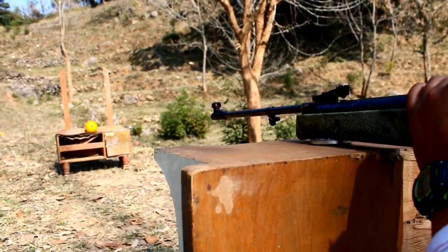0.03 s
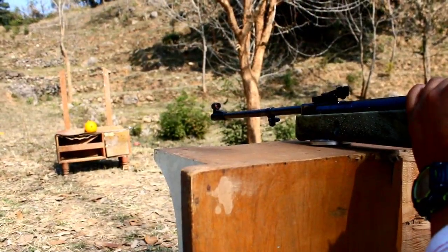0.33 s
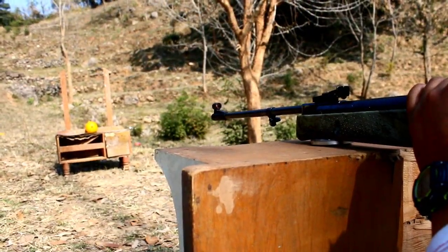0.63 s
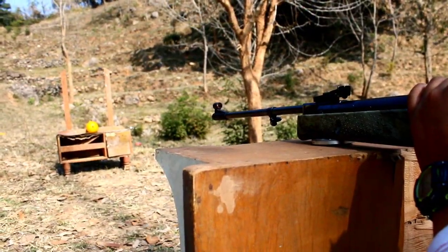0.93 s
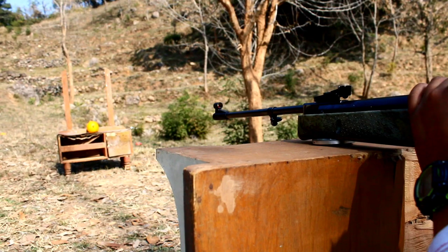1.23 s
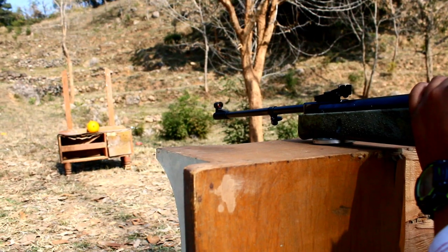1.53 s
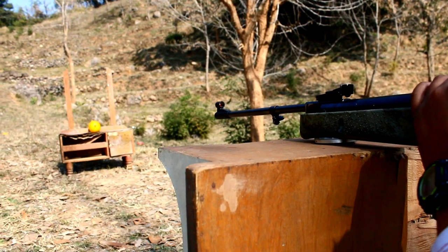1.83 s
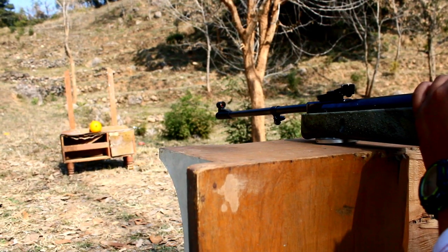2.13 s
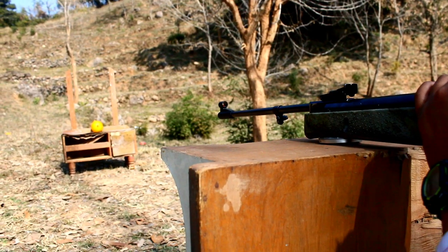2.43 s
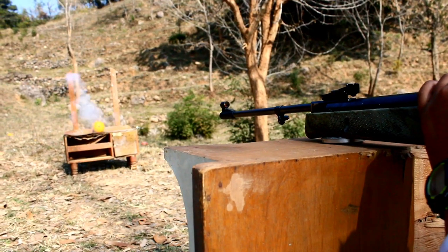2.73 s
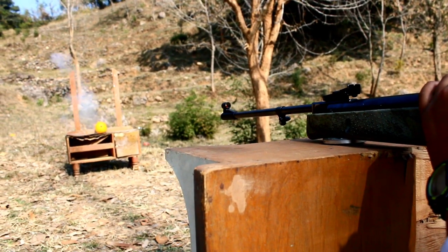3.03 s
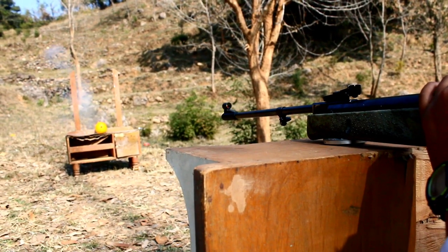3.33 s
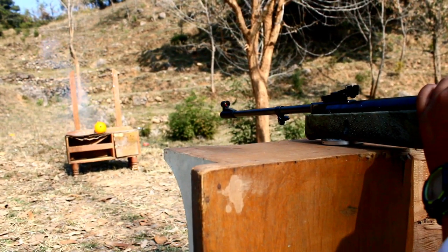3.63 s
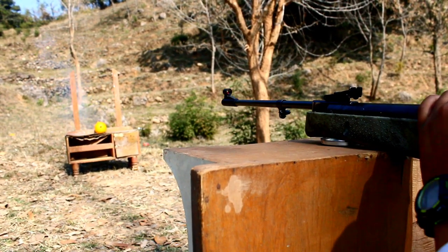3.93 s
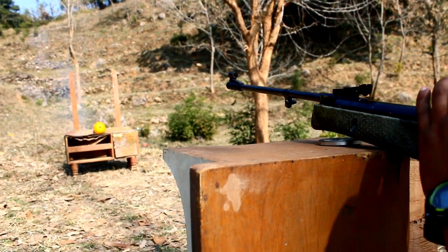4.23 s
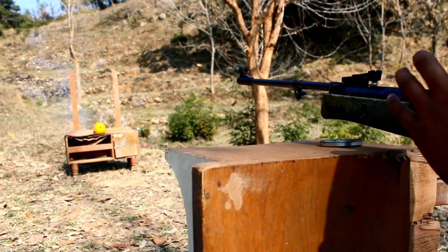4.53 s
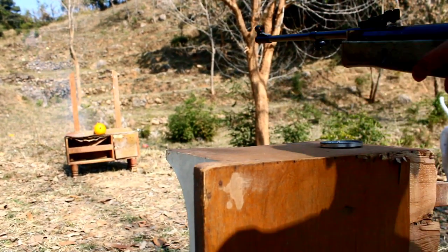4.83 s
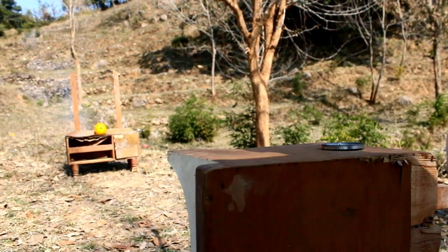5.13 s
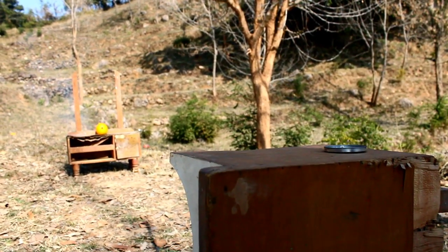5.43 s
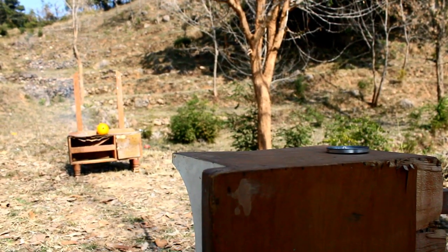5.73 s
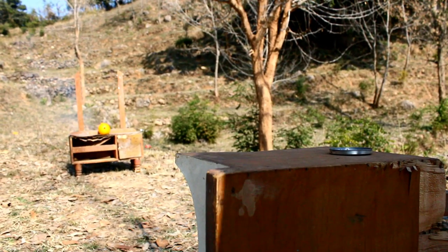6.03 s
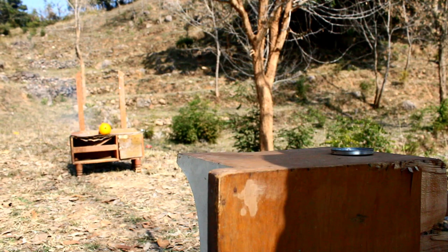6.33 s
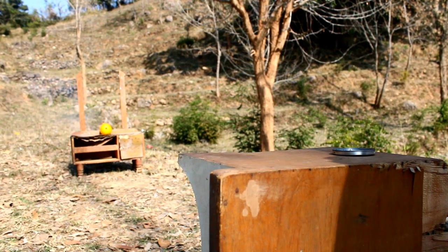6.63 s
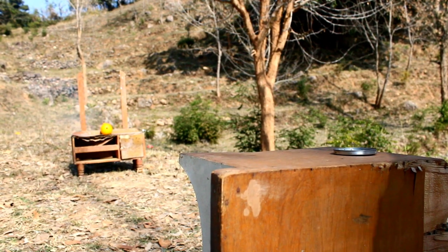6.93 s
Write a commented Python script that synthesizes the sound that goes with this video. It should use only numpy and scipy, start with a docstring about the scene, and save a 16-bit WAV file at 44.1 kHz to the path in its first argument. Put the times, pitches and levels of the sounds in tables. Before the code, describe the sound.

One sharp, loud bang from an air rifle and exploding target rolls away outdoors, followed by faint ticks, wooden knocks and crunching leaves.

```python
"""In still air below a wooded hillside, an air rifle clicks as it is handled and knocks on a wooden box.
The spring lets go, the piston slams, the shot cracks and the pellet sets off a small explosive charge,
overloading the microphone. Trees and slope roll the bang back while bits of debris tick down.
The stock is dragged off the drumming box, the rifle is lifted, and feet shift on dry leaves."""
import sys
import numpy as np
from scipy import signal
from scipy.fft import rfft, irfft, next_fast_len
from scipy.io import wavfile
from scipy.ndimage import uniform_filter1d

SR = 44100
rng = np.random.default_rng(int(sys.argv[2]) if len(sys.argv) > 2 else 0)


def wrap_up_sound(samples):
    """Save the sound to the file named by the first command line argument, as 16-bit audio."""
    columns = np.atleast_2d(samples).T
    # keep every value between -1 and 1, then stretch to whole-number steps
    tamed = np.clip(columns, -1, 1)
    steps = np.round(tamed * 32767).astype(np.int16)
    wavfile.write(sys.argv[1], SR, steps)


N = 308435
TIME_S = np.arange(N) / SR


def from_db(db):
    """Decibels to gain."""
    return 10 ** (np.asarray(db) / 20)


def unit_rms(x):
    """Scale to rms 1."""
    return x / np.sqrt(np.mean(np.abs(x) ** 2) + 1e-20)


def butter(x, hz, kind, order=2):
    """Causal Butterworth filter."""
    sos = signal.butter(order, np.clip(hz, 10, .45 * SR), kind, fs=SR, output="sos")
    return signal.sosfilt(sos, x + 1e-18)


def coloured(x, spectrum):
    """Shape x by (Hz, dB) points on a log-frequency axis; rms 1."""
    size = next_fast_len(len(x))
    hz, db = np.transpose(spectrum)
    bin_hz = np.maximum(np.fft.rfftfreq(size, 1 / SR), 1)
    gain = from_db(np.interp(np.log(bin_hz), np.log(hz), db))
    return unit_rms(irfft(rfft(x, size) * gain, size)[:len(x)])


def resonance(x, hz, width_hz):
    """Two-pole resonance, peak gain 1."""
    r = np.exp(-np.pi * width_hz / SR)
    feedback = [1, -2 * r * np.cos(2 * np.pi * hz / SR), r * r]
    return signal.lfilter(np.array([1, 0, -1]) * (1 - r * r) / 2, feedback, x)


def decay(t, t60_s):
    """Exponential fall, 60 dB in t60_s."""
    return np.exp(-np.log(1000) * t / t60_s)


def swell(peak_s, db, rise_s, fall_s):
    """Power envelope: up 20 dB per rise_s until peak_s, then down 20 dB per fall_s."""
    drop_db = 20 * np.maximum((peak_s - TIME_S) / rise_s, (TIME_S - peak_s) / fall_s)
    return from_db(db - drop_db.clip(max=200)) ** 2


def patches(shape, size):
    """Smooth random field over frequency and time; rms 1."""
    field = rng.standard_normal(shape)
    for axis in (0, 1, 0, 1):
        field = uniform_filter1d(field, size, axis=axis)
    return unit_rms(field)


def grains(per_s, spread_db):
    """Random clicks of uneven size."""
    sizes = from_db(spread_db * np.minimum(rng.exponential(1, N), 4)) * rng.choice([-1, 1], N)
    return sizes * (rng.random(N) < per_s / SR)


def add(out, start_s, sound):
    """Mix a sound in at start_s."""
    at = round(start_s * SR)
    out[at:at + len(sound)] += sound[:N - at]


# outdoor air: (frequency [Hz], density [dB])
AIR_SPECTRUM = [(15, -41), (25, -10.5), (59, -13.5), (154, -2), (318, -3.5), (415, -5.5), (450, -3.5),
                (749, -6), (833, -7), (978, -6.5), (2560, -11), (5570, -20.5), (7890, -35), (15000, -41)]


def still_air(level_db=-69):
    """Faint, steady outdoor noise."""
    return from_db(level_db) * coloured(rng.standard_normal(N), AIR_SPECTRUM)


# rifle modes: (frequency [Hz], level [dB], t60 [s])
RIFLE_MODES = [(417, -6.5, 0.015), (752, -4.5, 0.03), (970, 2, 0.01678), (1350, -6, 0.02763),
               (1778.8, -2, 0.017), (2030, -3.5, 0.017), (2510, -0.5, 0.023), (2720, -10, 0.039),
               (3480, -6, 0.01122), (4187.2, -3.5, 0.01718), (5105, -10, 0.0155)]
# handling contacts: (time [s], level [dB], low-pass cutoff [Hz])
RIFLE_CLICKS = [(0.093, -51, 2200), (0.116, -47, 4500), (1.089, -49.5, 2400), (1.152, -52, 4200),
                (4.4402, -39, 5400), (4.467, -53, 3497), (4.501, -45.5, 2600), (4.527, -46, 2893),
                (4.537, -52, 2200), (4.549, -53, 4500), (5.192, -51, 3480)]


def handling(crack_db=-6, crack_t60_s=0.032, spread_db=1.1):
    """Each click rings the rifle's modes with strengths of its own; a soft contact dulls it."""
    out, t = np.zeros(N), TIME_S[:SR // 8]
    for start_s, db, cutoff_hz in RIFLE_CLICKS:
        ring = 0
        for hz, mode_db, t60_s in RIFLE_MODES:
            gain = from_db(mode_db + rng.normal(0, spread_db)) * rng.choice([-1, 1])
            ring += gain * np.sin(2 * np.pi * hz * t) * decay(t, t60_s)
        crack = from_db(crack_db) * rng.standard_normal(len(t)) * decay(t, crack_t60_s)
        click = butter(ring + crack, cutoff_hz, "low", order=3)
        add(out, start_s, from_db(db) * click / np.abs(click).max())
    return out


# stock on the box, heels and twigs: (time [s], level [dB], pitch [Hz])
KNOCK_CONTACTS = [(1.924, -60, 200), (3.536, -45, 258), (3.655, -51, 240.3), (4.124, -44.5, 699.5),
                  (4.126, -42.5, 302), (4.14, -43, 85), (4.147, -47.5, 1400), (4.17, -57, 2806),
                  (4.9, -61, 240), (5.697, -61, 200), (5.748, -54, 190), (5.767, -46.5, 144.7),
                  (5.8743, -45.5, 259.6), (5.877, -39, 1060), (5.924, -55.5, 1396), (6.052, -52, 3795),
                  (6.097, -43, 2310), (6.099, -45.5, 605), (6.221, -54, 2303), (6.235, -51, 900),
                  (6.263, -54.5, 1900), (6.343, -57, 1400)]


def knocks(width_ratio=0.35, top_ratio=3.4, t60_1khz_s=0.029, t60_power=0.37):
    """Short rough contacts, each through one broad, damped resonance; lower ones last longer."""
    out, t = np.zeros(N), TIME_S[:SR // 6]
    for start_s, db, hz in KNOCK_CONTACTS:
        t60_s = t60_1khz_s * (1000 / hz) ** t60_power
        burst = rng.standard_normal(len(t)) * decay(t, t60_s)
        knock = butter(resonance(burst, hz, width_ratio * hz), top_ratio * hz, "low")
        add(out, start_s, from_db(db) * np.std(burst) * unit_rms(knock))
    return out


# steel spring modes: (frequency [Hz], level [dB], t60 [s])
SPRING_MODES = [(1470, -27, .09), (1840.5, -24.5, .09), (2573, -22.5, .04), (3137, -26.5, .045),
                (5044, -21, 0.024)]


def spring(start_s=2.5878):
    """The spring and its tube ring briefly when the sear lets go."""
    out, t = np.zeros(N), TIME_S[:SR // 6]
    for hz, db, t60_s in SPRING_MODES:
        add(out, start_s, from_db(db) * np.sin(2 * np.pi * hz * t) * decay(t, t60_s))
    return out


# spring, piston, muzzle crack and ground bounce, pellet strike and bounce, charge, near echoes:
# (time [s], spray level [dB], t60 [s], ring pitch [Hz], ring re spray [dB], pulse level [dB])
SHOT_BLOWS = [(2.5878, -16, 0.11, 1676, -6, -32.5), (2.6054, -19, 0.058, 313.5, 11.5, -7),
              (2.608, 4, 0.01, 3280, -3.5, -4), (2.6122, -4.5, 0.054, 2430, -5.5, -17.5),
              (2.6246, 1, 0.062, 2380, 1.5, -11), (2.638, -7.5, 0.015, 1994, -4.5, -15),
              (2.6602, 10, 0.054, 1103, 3.5, 4), (2.6668, -0.5, 0.052, 526, 8, -3),
              (2.677, -10.5, 0.089, 1380, 3.5, 2), (2.6845, -12.5, 0.035, 400.6, 5, -7),
              (2.6946, -3, 0.046, 1268, 2.5, -20)]
# spray of reflections: (frequency [Hz], density [dB])
SPRAY_SPECTRUM = [(30, -12.5), (70, -12), (150, -1), (280, 1.5), (600, -1), (1200, -1), (1700, -2),
                  (2700, 0.5), (3800, -9.5), (5200, -6.5), (6500, -14), (9000, -19), (15000, -30)]


def shot(pulse_s=.003, rise_s=0.00014, waver_ratio=0.23, waver_hz=700, sink_power=2.2):
    """Each blow: an N-shaped pressure pulse, a spray of near reflections, a ragged ring that sinks."""
    out, t = np.zeros(N), TIME_S[:SR // 4]
    pulse = (1 - 2 * t / pulse_s) * (t < pulse_s)
    for start_s, db, t60_s, hz, ring_db, pulse_db in SHOT_BLOWS:
        spray = coloured(rng.standard_normal(len(t)), SPRAY_SPECTRUM)
        waver = unit_rms(butter(rng.standard_normal(len(t)), waver_hz, "low"))
        sink_octaves_per_s = 9.8 * (hz / 1000) ** sink_power
        pitch_hz = hz * (2 ** (-sink_octaves_per_s * t) + waver_ratio * waver)
        ring = np.sqrt(2) * np.cos(2 * np.pi * np.cumsum(pitch_hz) / SR)
        envelope = from_db(db) * (1 - np.exp(-t / rise_s)) * decay(t, t60_s)
        add(out, start_s, from_db(pulse_db) * pulse + envelope * (spray + from_db(ring_db) * ring))
    return out


# scatter from ground and hillside: (frequency [Hz], density [dB])
ECHO_SPECTRUM = [(18, -64), (30, -34), (113, -11), (187, -16), (217, -11), (407, -7.5), (623, 0.5),
                 (821, -2.5), (1030, 0), (1420, -8.5), (2410, -6.5), (3430, -18), (5520, -26), (7270, -42),
                 (12000, -100), (15600, -130), (22000, -120)]


def near_ground(start_s=2.607, level_db=-21, t60_s=0.15):
    """The rifle's own report scatters off the ground and the nearest trees."""
    out, t = np.zeros(N), TIME_S[:SR // 2]
    scatter = coloured(rng.standard_normal(len(t)), ECHO_SPECTRUM)
    add(out, start_s, from_db(level_db) * decay(t, t60_s) * scatter)
    return out


# near trees, slope, upper bank, far hills: (peak time [s], level [dB], rise [s], fall [s])
HILL_RETURNS = [(2.68, -8.5, .03, 0.069), (2.73, -16, 0.12, 0.34), (2.865, -20, .1, 0.4),
                (3.3, -38, 0.52, 0.82)]


def hillside(start_s=2.672, onset_s=0.025, neutral_s=2.82, echoes_per_s=1500, patchy_db=1.4):
    """Countless echoes off trunks and banks; on the way, air takes the treble and ground the bass."""
    distinct = unit_rms(rng.standard_normal(N) * (rng.random(N) < echoes_per_s / SR))
    echoes = coloured(rng.standard_normal(N) + 0.62 * distinct, ECHO_SPECTRUM)
    echoes /= np.std(butter(echoes, [400, 2500], "band", order=4))  # midrange rms 1
    hz, frame_s, bins = signal.stft(echoes, SR, nperseg=1024)
    air_db_per_s = 3 * (hz / 1000) ** 1.52
    ground_db_per_s = 27 / (1 + (hz / 170) ** 8)
    loss_db = np.outer(air_db_per_s + ground_db_per_s, np.maximum(frame_s, start_s) - neutral_s)
    colour_db = patchy_db * patches(bins.shape, size=4) - loss_db
    roll = signal.istft(bins * from_db(colour_db), SR)[1][:N]
    power = sum(swell(*row) for row in HILL_RETURNS)
    return roll * np.sqrt(power) * np.clip((TIME_S - start_s) / onset_s, 0, 1)


# single echoes from far banks: (time [s], level [dB])
BANK_ECHOES = [(2.73, -20), (2.747, -18), (3.482, -44), (3.828, -51)]


def bank_slaps(t60_s=0.15, low_hz=420, high_hz=1400):
    """Bare banks return the bang as short, dull slaps."""
    out, t = np.zeros(N), TIME_S[:SR // 4]
    for start_s, db in BANK_ECHOES:
        echo = butter(rng.standard_normal(len(t)), low_hz, "high")
        echo = butter(echo, high_hz, "low", order=3)
        add(out, start_s, from_db(db) * decay(t, t60_s) * unit_rms(echo))
    return out


# falling bits: (time [s], level [dB])
DEBRIS_LANDINGS = [(3.1092, -34.5), (3.163, -50), (3.4553, -48.5), (3.7145, -52), (4.004, -41.5)]


def debris(hz=6000, width_hz=2400, t60_s=0.012):
    """Small bits land on dry leaves with a bright tick."""
    out, t = np.zeros(N), TIME_S[:SR // 20]
    for start_s, db in DEBRIS_LANDINGS:
        tick = resonance(rng.standard_normal(len(t)) * decay(t, t60_s), hz, width_hz)
        add(out, start_s, from_db(db) * tick / np.abs(tick).max())
    return out


# box panel modes: (frequency [Hz], width [Hz], level [dB])
BOX_MODES = [(74, 27, 2), (112, 21, -5), (138.2, 17.5, 0), (177, 20.5, -4.5), (241.3, 109, -17.5),
             (322.4, 50, -15.5), (550, 174, -26)]
# pushes on the stock: (peak time [s], level [dB], rise [s], fall [s], slip rate [1/s])
STOCK_PUSHES = [(3.78, -69.5, .1, 0.31, 85), (3.886, -55.5, 0.024, 0.037, 170),
                (3.945, -59.5, 0.056, 0.078, 130), (4.09, -50.5, 0.0296, 0.098, 76),
                (4.136, -44.5, .06, .11, 74), (4.22, -51, .1, .17, 130)]


def box_drag(unevenness=0.29, jitter_hz=59.83, grit=0.036, low_hz=46, high_hz=700):
    """The stock sticks and slips, drumming the hollow box; the strongest push sets the pace."""
    push_powers = np.array([swell(*row[:-1]) for row in STOCK_PUSHES])
    power = push_powers.sum(axis=0)
    pace_per_s = np.array(STOCK_PUSHES)[:, -1] @ push_powers / power
    jitter = unit_rms(butter(rng.standard_normal(N), jitter_hz, "low"))
    slip_count = np.floor(np.cumsum(pace_per_s * np.exp(unevenness * jitter)) / SR)
    force = np.diff(slip_count, prepend=0) + grit * rng.standard_normal(N)
    drum = sum((-1) ** k * from_db(db) * resonance(force, hz, width_hz)
               for k, (hz, width_hz, db) in enumerate(BOX_MODES))
    drum = butter(butter(drum, low_hz, "high"), high_hz, "low")
    running_rms = np.sqrt(uniform_filter1d(drum ** 2, size=2200) + 1e-12)
    return np.sqrt(power) * drum / running_rms


# leaf crunch: (frequency [Hz], density [dB])
LEAF_SPECTRUM = [(60, -11), (170, 2.5), (400, 1.5), (600, 5), (1200, -1), (1800, -4.5), (2600, -7),
                 (4000, -16), (6000, -19), (9000, -21)]
# soles and sleeves: (peak time [s], level [dB], length [s], crackle re scuff [dB])
SCUFF_STROKES = [(3.836, -56, .55, -14), (4.135, -58.5, .35, -25), (4.53, -64, .3, -8),
                 (5.045, -67, 0.27, -5.5), (5.177, -67, 0.69, -9), (5.587, -59, .3, -19),
                 (5.67, -62.5, .2, -15), (5.753, -51.5, 0.096, -23), (5.897, -59, .17, -11),
                 (6.055, -57.5, 0.057, -10), (6.104, -54.5, 0.26, -15), (6.253, -66, .2, -16),
                 (6.5, -59.5, 0.36, -20), (6.613, -55, 0.24, -13), (6.901, -65, 0.17, -20)]


def feet(rise_share=.4, crackle_hz=3000, crackle_width_hz=2600):
    """Leaves crunch in dense grains under a shifting sole; the driest ones crackle."""
    crunch_power, crackle_power = np.zeros(N), np.zeros(N)
    for peak_s, db, length_s, crackle_db in SCUFF_STROKES:
        power = swell(peak_s, db, rise_share * length_s, (1 - rise_share) * length_s)
        crunch_power += power
        crackle_power += power * from_db(crackle_db) ** 2
    crunch = coloured(grains(per_s=2500, spread_db=2.5), LEAF_SPECTRUM)
    crackle = unit_rms(resonance(grains(per_s=1200, spread_db=4.0), crackle_hz, crackle_width_hz))
    return np.sqrt(crunch_power) * crunch + np.sqrt(crackle_power) * crackle


def microphone(x, low_hz=45, high_hz=6400):
    """The small capsule passes little deep bass and rolls off steeply in the treble."""
    return butter(butter(x, high_hz, "low", order=8), low_hz, "high", order=1)


def scene():
    """Mono mix: sharp sounds through the capsule filter, plus diffuse echoes and air."""
    air = still_air()
    sharp = handling() + knocks() + spring() + shot() + bank_slaps() + debris() + box_drag() + feet()
    diffuse = near_ground() + hillside()
    return (air + microphone(sharp) + diffuse)[None]


def record(dry, bend=0.049, output_db=-0.04, cutoff_hz=15400):
    """The input clips at full scale and bends slightly on loud swings; then the top is cut."""
    clipped = np.clip(dry, -1, 1)
    bent = from_db(output_db) * (clipped + bend * clipped * (1 - clipped * clipped))
    return signal.sosfilt(signal.ellip(10, .1, 70, cutoff_hz, fs=SR, output="sos"), bent)


dry = scene()
out = record(dry)
wrap_up_sound(out)
```